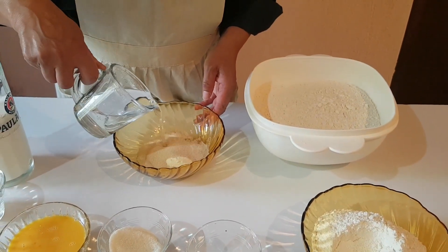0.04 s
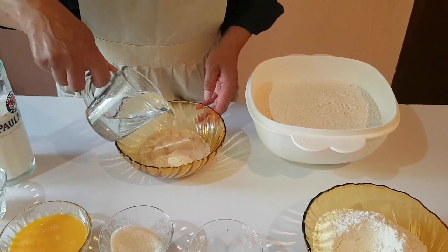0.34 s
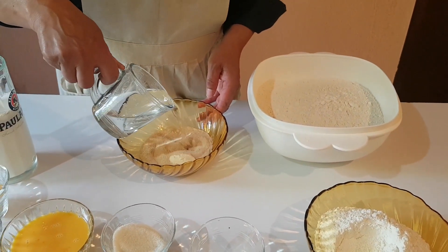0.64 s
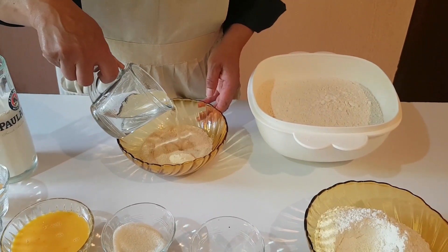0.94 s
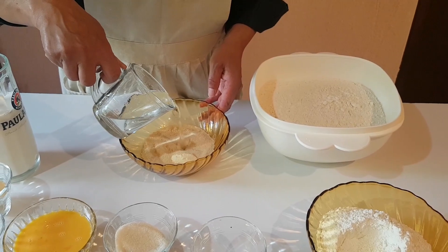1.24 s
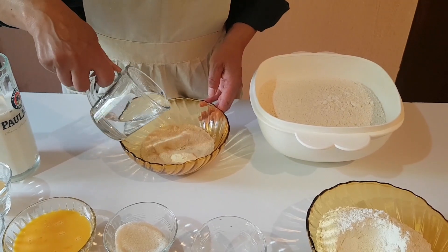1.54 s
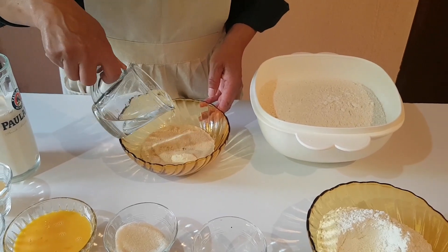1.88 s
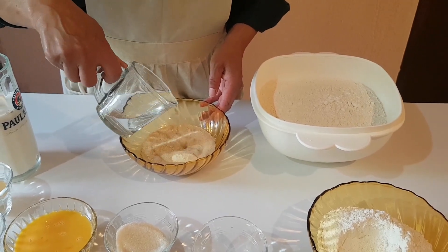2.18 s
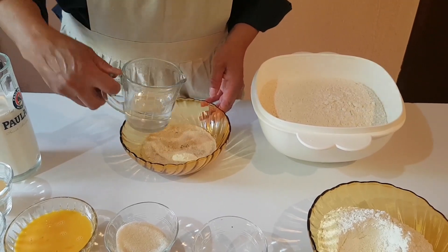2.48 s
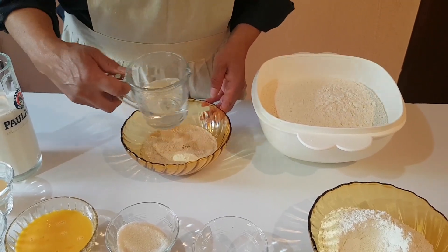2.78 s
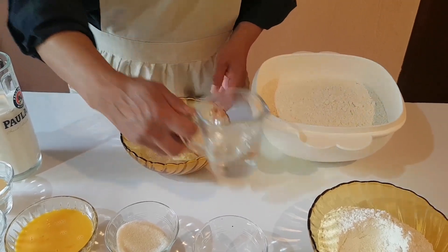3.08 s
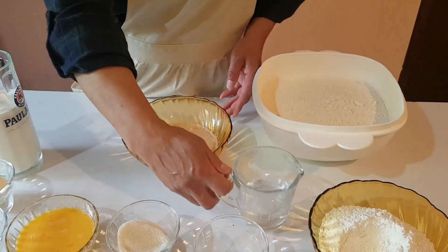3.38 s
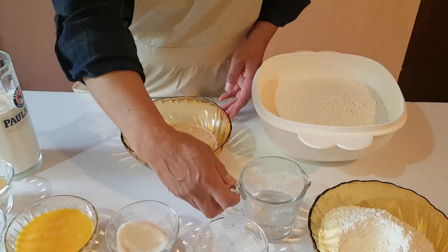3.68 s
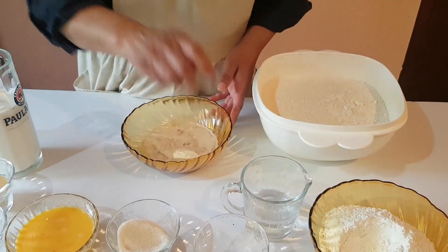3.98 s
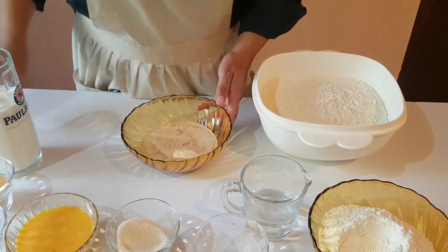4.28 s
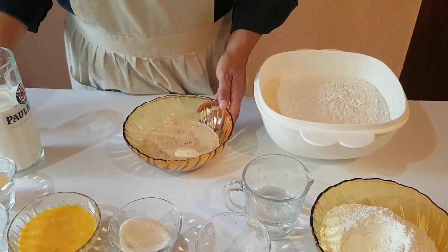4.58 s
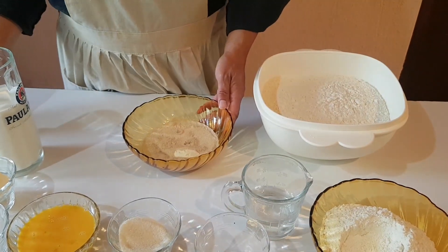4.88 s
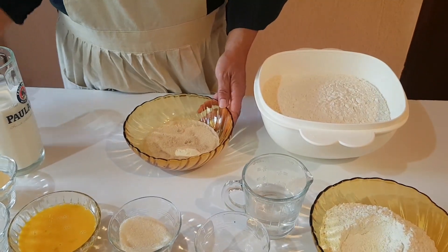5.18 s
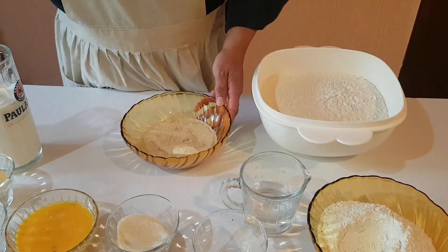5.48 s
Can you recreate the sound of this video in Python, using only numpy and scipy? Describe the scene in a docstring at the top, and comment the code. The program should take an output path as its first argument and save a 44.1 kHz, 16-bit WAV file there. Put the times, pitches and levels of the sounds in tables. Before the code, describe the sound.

Low room tone fills a slightly echoing kitchen, heard from nearby. At about 0.7 seconds a sleeve brushes, and a faint, bubbly trickle of water swells into a glass bowl, with small drips and a few sharper splashes between 1 and 1.5 seconds. At 1.6 seconds a glass jug clinks twice in quick succession against the rim, and the bowl rings briefly. The trickle thins, with last drips around 2.3 seconds and very faint plinks in the jug until 3 seconds. At 3.6 seconds comes the loudest sound: the jug is set down on the table with a hollow, booming knock, then rocks flat with two softer knocks. Cloth swishes with a small click near 4 seconds. Around 4.7 seconds the table is bumped lightly and the jug shivers faintly. More cloth scuffs and crisp little clicks follow at 5 seconds, and a slipper starts dragging softly at the end.

```python
"""Pouring from a glass jug

Water trickles into a glass bowl in a hard-walled kitchen, sounding through tiny bubbles and drop impacts.
The jug clinks twice on the rim, exciting the bowl's modes. Set down with a hollow knock, it rocks flat
while the table top booms and its own glass rings faintly. Sleeves and slippers scuff by friction as the
cook shifts, over a quiet room tone."""
import sys
import numpy as np
from scipy import signal
from scipy.fft import rfft, irfft, next_fast_len
from scipy.io import wavfile
from scipy.ndimage import map_coordinates

SR = 44100
rng = np.random.default_rng(int(sys.argv[2]) if len(sys.argv) > 2 else 0)


def unload_audio(sound):
    """Save the sound as a 16-bit wav file, at the path given as the first command line argument."""
    columns = np.transpose(np.atleast_2d(sound))
    # keep every value between -1 and 1, then stretch to whole-number steps
    steps = np.round(np.clip(columns, -1, 1) * 32767)
    wavfile.write(sys.argv[1], SR, steps.astype(np.int16))


N = 252628
T = np.arange(int(1.5 * SR)) / SR  # time axis of one event, in seconds


def trickle(count=4000, bubble_hz=1800, spread=0.4, t60_periods=10):
    """Bubble resonance: a thin stream traps tiny air bubbles, each a briefly ringing oscillator."""
    patter = np.zeros((2, N))
    t = T[:SR // 40]
    for pitch, left, right in rng.standard_normal((count, 3)):
        hz = bubble_hz * np.exp(spread * np.clip(pitch, -2, 2))
        bubble = np.sin(2 * np.pi * hz * t) * fade(t, t60_periods / hz)
        add(patter, rng.uniform(0, N / SR), np.outer([left, right], bubble))
    pour = swell(s=1.55, half_width=1.05, db=-64.5)
    gush = swell(s=1.487, half_width=0.07, db=-58.5)  # the jug tips further
    return kitchen(unit(patter) * (pour + gush), direct_db=-13, wet_db=-6)


# Spectrum of a drop's impact. Each row: frequency in Hz, density in dB.
DROP_SPECTRUM = [(500, -51), (1100, 7.5), (2200, 3), (6000, -6), (9000, -10), (11500, -8), (13500, 2),
                 (16000, -2.5)]
# The loudest drops. Each row: start in seconds, level in dB, splash emphasis up to 4 kHz in dB.
DROP_IMPACTS = [(1.077, -48.5, -2), (1.434, -47, 7), (1.504, -42, 8), (1.543, -46, 10), (2.286, -42.5, -10)]
TICK_T60_S = 0.01
def drops():
    """Impact noise: each drop landing in the bowl gives a short broadband tick."""
    out = np.zeros((2, N))
    for s, db, splash_db in DROP_IMPACTS:
        tick = burst(fade(T, TICK_T60_S), DROP_SPECTRUM, [(4000, splash_db), (11000, 0)])
        add(out, s, amp(db) * kitchen(tick, direct_db=-1, wet_db=-8))
    return out


# Runs of small drips. Each row: start and end in seconds.
DRIP_SPANS = [(0.95, 1.6), (2.14, 2.4)]
def drips(per_second=36, db=-58, scatter_db=2.5):
    """Shot noise: small drips of uneven size tick at independent random moments."""
    ticks = np.zeros(N)
    for start, end in DRIP_SPANS:
        count = round(per_second * (end - start))
        for s, size in zip(rng.uniform(start, end, count), rng.standard_normal(count)):
            add(ticks, s, amp(db + scatter_db * size) * fade(T, TICK_T60_S))
    return ticks * wash(DROP_SPECTRUM)


# Plinks in the jug. Each row: start in seconds, frequency in Hz, level in dB.
JUG_PLINKS = [(2.555, 4620, -73), (2.88, 2385, -69.5), (2.925, 2150, -69.5), (3.04, 4400, -73)]
def plinks(t60=0.37):
    """Damped resonance: water falling back into the righted jug rings one note per plink."""
    out = np.zeros((2, N))
    for s, hz, db in JUG_PLINKS:
        add(out, s, ring([(hz, db, t60)], beating=0.97, beat_rate=120, attack=0.006))
    return out


# Modes of the bowl. Each row: frequency in Hz, level in dB, T60 in seconds, dB added at rim place 1.
BOWL_MODES = [(1370, -19, 0.71, 14.5), (1808, 0.5, 0.45, -14), (1830, -13, 0.075, -4),
              (2337, 2, 0.84, -5.5), (2420, -2, 0.41, -1), (2590, -5.5, 0.75, -10),
              (2730, 13.5, 0.037, -6.5), (3538, -10.5, 0.74, 13), (3584, -8.5, 0.62, 7.5),
              (4177, -18, 0.47, -5.5), (4940, -4, 0.77, -13), (5010, -3.5, 0.77, -23),
              (5160, 7, 0.069, -11), (6560, 5, 0.14, 0.5), (6560, -11, 0.65, -3), (12600, -25, .3, 0),
              (14400, -25, 0.22, 3)]
def bowl_ring(place, damped_s=0.4):
    """Modal excitation: the place struck on the rim sets each mode's strength; a hand damps the ring."""
    modes = [(hz, db + place * gain_db, t60) for hz, db, t60, gain_db in BOWL_MODES]
    hand_damping = np.exp(-(T / damped_s) ** 4)
    return ring(modes, beating=0.74, beat_rate=71, attack=0.00074) * hand_damping


# Spectra of glass on glass, the clack and its bright edge. Each row: frequency in Hz, density in dB.
CLACK_SPECTRUM = [(50, -34), (120, -12), (330, 4), (480, -0.5), (600, -13), (830, -4), (1250, -8.5),
                  (2600, -9.5), (3200, -19), (5100, -15.5), (5800, -20.5), (6600, -9.5), (8300, -33.5),
                  (14000, -45)]
EDGE_SPECTRUM = [(2000, -39.5), (5000, -4.5), (7000, 0), (8800, -5), (10500, 5), (13000, 2), (16000, -7)]
# Jug against bowl. Each row: start in seconds, clack, thump and ring levels in dB, rim place from 0 to 1.
RIM_STRIKES = [(1.6196, -21, -33, -37.5, 0.01), (1.6856, -29, -44, -39.5, 0.88)]
def clinks(edge_db=-41):
    """Impact and rebound: each hard contact clacks, rings the bowl and thumps the table beneath it."""
    out = np.zeros((2, N))
    for s, clack_db, thump_db, ring_db, place in RIM_STRIKES:
        # a light touch barely pushes the table, so its clack has less bass
        weight = [(450, thump_db - clack_db + 15), (1800, 0)]
        clack = kitchen(burst(fade(T, 0.076), CLACK_SPECTRUM, weight), direct_db=-1, wet_db=-0.5)
        glass = bowl_ring(place)
        thump = table_ring(bright_db=-8.5)  # the bowl in between softens the upper modes
        edge = kitchen(burst(fade(T, 0.056), EDGE_SPECTRUM), direct_db=-8.5, wet_db=-8.5)
        add(out, s, amp(clack_db) * clack + amp(edge_db) * edge)
        add(out, s, amp(ring_db) * glass + amp(thump_db) * thump)
    return out


# Spectrum of a knock on the table. Each row: frequency in Hz, density in dB.
KNOCK_SPECTRUM = [(25, -28), (60, -30.5), (120, -15.5), (230, -10), (300, -0.5), (530, -2.5), (660, -7.5),
                  (830, -3), (1400, -8), (2300, -16), (3200, -25.5), (6300, -37.5), (8300, -52.5),
                  (15000, -49.5)]
# Blows on the table. Each row: start in seconds, knock, table and jug levels in dB, treble gain in dB.
TABLE_BLOWS = [(3.573, -15, -29, -53.5, -1.5), (3.617, -20, -53, -69, -6), (3.775, -26.5, -46, -91, -11.5),
               (4.750, -35.5, -59, -57, -9.5), (4.791, -40, -61.5, -57, -19)]
def knocks(push_db=19):
    """Impulsive forcing: the jug lands and rocks flat, then the table is bumped. Soft blows are dull."""
    out = np.zeros((2, N))
    impulse = np.ones((2, 1)) * (T == 0)  # the first wave is alike at both microphones
    for s, knock_db, table_db, jug_db, treble_db in TABLE_BLOWS:
        hardness = [(500, 0.021), (2000, treble_db)]
        push = amp(push_db) * coloured(impulse, KNOCK_SPECTRUM, hardness)
        scatter = burst(fade(T, 0.1), KNOCK_SPECTRUM, hardness)
        knock = kitchen(push + scatter, direct_db=-3.5, wet_db=-2)
        add(out, s, amp(knock_db) * knock + amp(table_db) * table_ring() + amp(jug_db) * jug_ring())
    add(out, 4.691, amp(-52.5) * jug_ring(attack=0.02))  # the jug shivers as the table is brushed
    return out


# Modes of the table top. Each row: frequency in Hz, level in dB, T60 in seconds.
TABLE_MODES = [(122.6, -5, 1), (175, -8, 0.41), (186.4, -8.5, 1.08), (220, -15, 1.21), (294, 2, 0.46),
               (323.3, 8, 0.24), (380.7, 2.5, 0.41), (402.4, 0.5, 0.34), (493, -6, 0.82), (486, -4.5, 0.71),
               (552.5, -6.5, 0.25), (671, -10, 0.41), (816, 4, 0.66), (833.5, 3, 0.35), (849, -3, 0.99),
               (894, 0.5, 0.35), (1065, -24.5, 0.95), (1095, -8.5, 0.89), (1448, -9, 0.34)]
def table_ring(bright_db=0):
    """Plate vibration: the low bending modes of the table top give a hollow boom."""
    tilt = [(480, 0.0097), (700, bright_db)]
    modes = [(hz, db + along(tilt, hz), t60) for hz, db, t60 in TABLE_MODES]
    return ring(modes, beating=0.059, beat_rate=18, attack=0.00069)


# Modes of the jug. Each row: frequency in Hz, level in dB, T60 in seconds.
JUG_MODES = [(4900, -11.5, 0.35), (6020, -7, .42), (6210, -5.5, 0.58), (7280, -9.5, 0.65), (9400, -38, .45),
             (10700, -15, .35), (11030, -17, 0.48), (12500, -15.5, .3), (12700, -10, 0.41), (14900, -8, .2)]
def jug_ring(attack=0.002):
    """Shell vibration: the jug's stiff glass wall rings thin and high."""
    return ring(JUG_MODES, beating=0.46, beat_rate=78, attack=attack)


def rub(rise, *spectra, grain_db=3, grain_rate=350):
    """Stick-slip friction: a run of small slips swells and dies away."""
    slips = unit(amp(grain_db * wobble(grain_rate)))
    motion = stroke(rise, t60=0.22 + 4.64 * rise)  # a slow stroke also dies slowly
    return kitchen(burst(slips * motion, *spectra), direct_db=0, wet_db=1.5)


# Friction spectra of cloth and of a slipper's sole. Each row: frequency in Hz, density in dB.
CLOTH_SPECTRUM = [(29, -50), (50, -10.5), (91, -19.5), (131, -1.5), (262, -12), (423, -3), (607, -5.5),
                  (735, -5.5), (1590, -10.5), (1880, -11), (2440, -11.5), (3500, -16.5), (7190, -25.5),
                  (8710, -39), (15500, -37.5)]
SOLE_SPECTRUM = [(35, -60), (60, -36), (119, -17.5), (378, -3), (589, -14.5), (839, -10), (959, -14),
                 (2540, -24), (12000, -60), (15600, -86), (22000, -120)]
# Brushing strokes. Each row: start and rise in seconds, level in dB, bass, hiss and air gains in dB.
SCUFF_STROKES = [(0.495, 0.0057, -59, 10, 1.5, 4), (0.659, 0.0075, -47, 2.5, -2, 8),
                 (0.682, 0.043, -37, 1.5, -2.5, 6), (3.939, 0.013, -39, -0.5, 13, 8.5),
                 (4.075, 0.015, -49.5, -9, -21, 1), (4.271, 0.018, -57, -20, -7, 2),
                 (4.686, 0.012, -46, -8, 4.5, -9), (4.745, 0.0072, -41, 0, -2.5, -5),
                 (4.910, 0.038, -49, -29, -6, -18), (5.009, 0.031, -40, -15, -8, -7),
                 (5.160, 0.02, -53.5, -6, 6.5, 9)]
def scuffs(body_share=0.4):
    """Sliding friction: sleeves and slippers sound deeper the more weight they bear."""
    out = np.zeros((2, N))
    for s, rise, db, bass_db, hiss_db, air_db in SCUFF_STROKES:
        weight = [(130, bass_db), (400, body_share * bass_db), (1300, 0)]
        sheen = [(2600, 0), (5000, hiss_db), (12000, air_db)]
        add(out, s, amp(db) * rub(rise, CLOTH_SPECTRUM, weight + sheen))
    add(out, 5.56, amp(-44.5) * rub(0.2, SOLE_SPECTRUM))  # a slipper drags over the floor
    return out


# Spectrum of a click. Each row: frequency in Hz, density in dB.
CLICK_SPECTRUM = [(300, -15), (1500, -6), (3000, 12.5), (4200, -5), (4900, 4), (6100, -5), (7500, -21),
                  (15000, -32)]
# Clicks of handling. Each row: start in seconds, level in dB.
HANDLING_CLICKS = [(3.952, -41.5), (4.9704, -37), (5.037, -44.5)]
def clicks():
    """Short transients: the brief contacts of handling reach far into the treble and sound crisp."""
    out = np.zeros((2, N))
    for s, db in HANDLING_CLICKS:
        click = burst(fade(T, 0.032), CLICK_SPECTRUM)
        add(out, s, amp(db) * kitchen(click, direct_db=2, wet_db=1.5))
    return out


# Soft steps and nudges. Each row: start in seconds, level in dB, centre frequency in Hz.
SOFT_CONTACTS = [(0.759, -53, 132), (2.19, -55.5, 430), (2.565, -57.5, 160), (2.672, -59, 384),
                 (3.36, -57.5, 135), (4.483, -50, 140)]
def bumps(skirt_db=-13.5, far_db=-45):
    """Heavy damping: a padded contact excites one dull, broad resonance that the room prolongs."""
    out = np.zeros((2, N))
    for s, db, hz in SOFT_CONTACTS:
        peak = [(20, far_db), (hz / 2, skirt_db), (hz, 0), (hz * 2, skirt_db), (6000, far_db)]
        thud = burst(stroke(rise=0.011, t60=0.28), peak + [(10000, -55)])
        add(out, s, amp(db) * kitchen(thud, direct_db=-0.5, wet_db=-3))
    return out


# Reaches of the arm. Each row: peak time and half-width in seconds, level in dB.
ARM_REACHES = [(2.28, 0.25, -66), (2.6, 0.092, -66.5), (2.92, 0.14, -69.5), (4.4, 0.88, -63)]
def rustle():
    """Friction noise: the apron's light hiss swells with each reach of the arm."""
    motion = sum(swell(s, half_width, db) for s, half_width, db in ARM_REACHES)
    lightness = [(150, 0.5), (700, -5), (2000, 1), (6000, 3.5), (13000, 13.5)]
    return motion * wash(CLOTH_SPECTRUM, lightness)


# Spectrum of the quiet room. Each row: frequency in Hz, density in dB.
ROOM_SPECTRUM = [(20, -38.5), (60, 6.5), (95, -6), (170, -4), (400, -6), (900, -11.5), (2000, -11.5),
                 (4000, -22), (7000, -25), (9300, -31.5), (13000, -25), (16000, -24)]
def room_tone(db=-66):
    """Stationary noise: the room's low murmur with a little microphone hiss."""
    return amp(db) * wash(ROOM_SPECTRUM)


# Reverberation times of the kitchen. Each row: frequency in Hz, T60 in seconds.
ROOM_T60 = [(120, 1.38), (400, 0.86), (1000, 0.73), (2500, 0.79), (6000, 0.51), (12000, 0.52)]
def kitchen(x, direct_db, wet_db, build_s=0.0031):
    """Reverberation: a tail follows the direct sound, each frequency absorbed at its own rate."""
    hz, t, bands = signal.stft(diffuse(len(T)), SR, nperseg=256)
    decay = fade(t, along(ROOM_T60, hz)[:, None])
    tail = signal.istft(bands * decay, SR, nperseg=256)[1]
    build_up = 1 - np.exp(-np.arange(tail.shape[1]) / SR / build_s)
    tail *= build_up / np.sqrt(SR * 0.055)
    wet = signal.fftconvolve(x[:1], tail, axes=1)[:, :x.shape[1]]
    return amp(direct_db) * x + amp(wet_db) * wet


# Likeness of left and right. Each row: frequency in Hz, coherence from 0 to 1.
COHERENCE = [(100, 0.93), (400, 0.84), (900, 0.14), (2000, 0.018), (7000, 0.055), (11000, 0.38)]
def diffuse(n):
    """Diffuse field: white noise from all sides, alike at both microphones mainly in the bass."""
    def shares(hz):
        angle = np.arccos(along(COHERENCE, hz)) / 2
        return np.array([np.cos(angle), np.sin(angle)])
    mid, side = filtered(rng.standard_normal((2, n)), shares)
    return np.array([mid + side, mid - side])


def ring(modes, beating, beat_rate, attack):
    """Interference: wall reflections make each decaying mode beat differently at the two microphones."""
    out = np.zeros((2, len(T)))
    depth = beating * (1 - np.exp(-T / 0.01))  # reflections build up behind the direct ring
    for hz, db, t60 in modes:
        echoes = np.array([wobble(beat_rate) + 1j * wobble(beat_rate) for _ in range(2)])
        phase = rng.random() + rng.random((2, 1)) * (1 - along(COHERENCE, hz)) / 2
        swing = np.exp(2j * np.pi * (hz * T + phase)) * (1 + depth * echoes)
        out += amp(db) * fade(T, t60) * swing.real
    return out * (1 - np.exp(-T / attack))


def burst(envelope, *spectra):
    """Source and filter: diffuse noise under an envelope, coloured by the spectra."""
    return coloured(diffuse(len(T)) * envelope, *spectra)


def wash(*spectra):
    """Spectral shaping: steady stereo noise of rms 1 following the summed dB spectra."""
    return unit(filtered(diffuse(N), lambda hz: amp(sum(along(s, hz) for s in spectra))))


def coloured(x, *spectra, size=4096):
    """Minimum-phase filtering: a causal pulse of unit energy carries the summed dB spectra."""
    hz = np.fft.rfftfreq(size, 1 / SR)
    gain = amp(sum(along(s, hz) for s in spectra))
    cepstrum = irfft(np.log(gain))
    cepstrum[1:size // 2] *= 2  # fold onto positive time
    cepstrum[size // 2 + 1:] = 0
    pulse = irfft(np.exp(rfft(cepstrum)))
    return signal.fftconvolve(x, pulse[None] / np.linalg.norm(pulse), axes=1)[:, :len(T)]


def filtered(x, gain):
    """Zero-phase filtering: the spectrum of x times gain(hz)."""
    n = x.shape[-1]
    padded = next_fast_len(n + 8192)
    hz = np.fft.rfftfreq(padded, 1 / SR)
    return irfft(rfft(x, padded) * gain(hz), padded)[..., :n]


def swell(s, half_width, db):
    """Gaussian envelope around time s."""
    return amp(db) * np.exp(-((np.arange(N) / SR - s) / half_width) ** 2)


def stroke(rise, t60):
    """Linear rise, then exponential decay."""
    return np.minimum(T / rise, 1) * fade(np.maximum(T - rise, 0), t60)


def fade(t, t60):
    """Exponential decay of 60 dB in t60."""
    return amp(-60 * t / t60)


def wobble(rate):
    """Smooth random modulation over one event, rate knots a second."""
    return map_coordinates(rng.standard_normal(2048), [T * rate], mode="wrap")


def along(points, hz):
    """Interpolation of (Hz, value) points on a log-frequency axis."""
    knots_hz, values = np.transpose(points)
    return np.interp(np.log(hz + 1), np.log(knots_hz), values)


def amp(db):
    """Decibels to gain."""
    return 10 ** (np.asarray(db) / 20)


def unit(x):
    """Normalisation to rms 1."""
    return x / np.sqrt(np.mean(x ** 2) + 1e-20)


def add(track, s, sound):
    """Superposition of a sound on the track at time s."""
    part = track[..., round(s * SR):][..., :sound.shape[-1]]
    part += sound[..., :part.shape[-1]]


def scene():
    """Superposition: the pressures of all sources in the kitchen add."""
    jug = clinks() + knocks()
    cook = scuffs() + clicks() + bumps() + rustle()
    water = trickle() + drips() + drops() + plinks()
    return water + jug + cook + room_tone()


# Imbalance of the microphones. Each row: frequency in Hz, left minus right in dB.
CHANNEL_BALANCE = [(100, 0), (500, -1), (2800, -2), (4500, -7), (6500, -10), (9000, 0), (13000, 1)]
def record(dry):
    """Frequency response: the two microphones differ in the treble and share a band limit."""
    top_hz = 15850
    sides = np.array([[0.5], [-0.5]])
    return filtered(dry, lambda hz: amp(sides * along(CHANNEL_BALANCE, hz)) * (hz < top_hz))


dry = scene()
out = record(dry)
unload_audio(out)
```